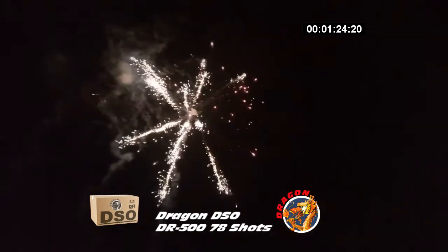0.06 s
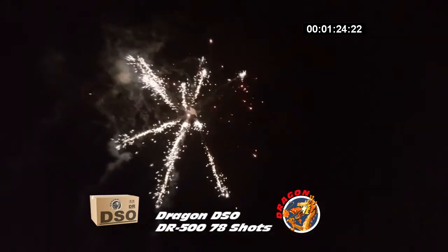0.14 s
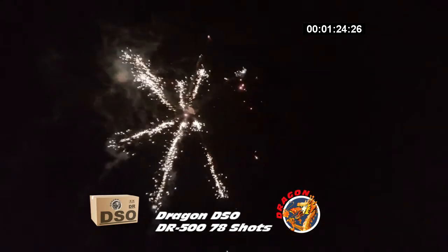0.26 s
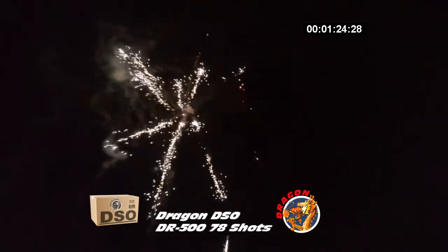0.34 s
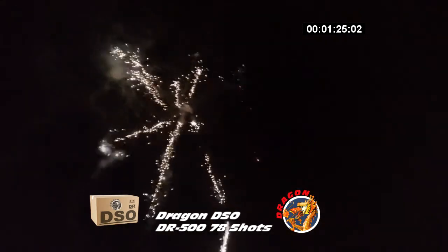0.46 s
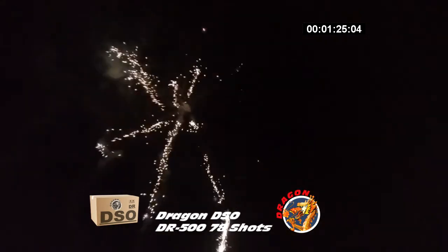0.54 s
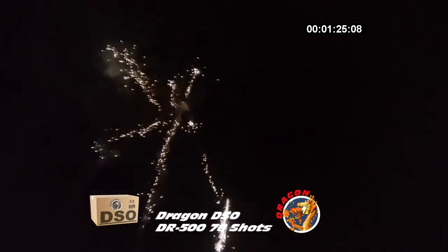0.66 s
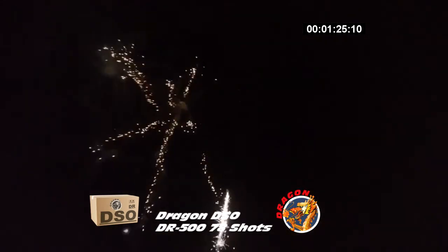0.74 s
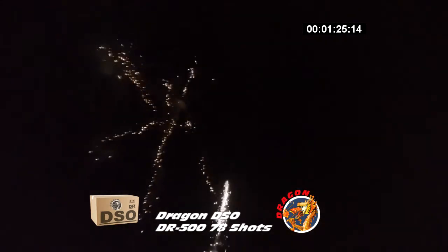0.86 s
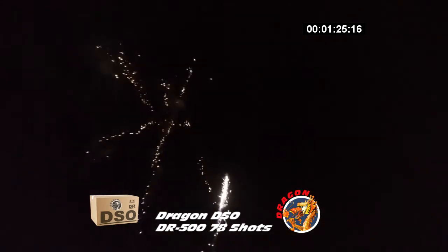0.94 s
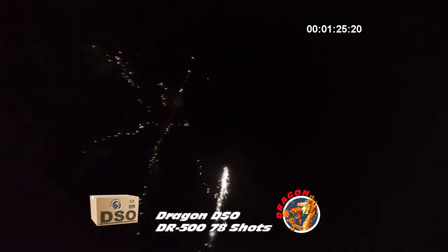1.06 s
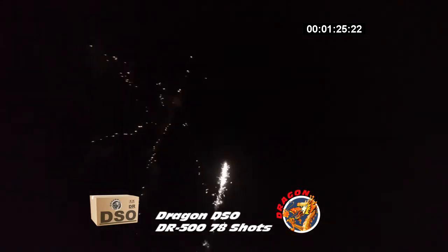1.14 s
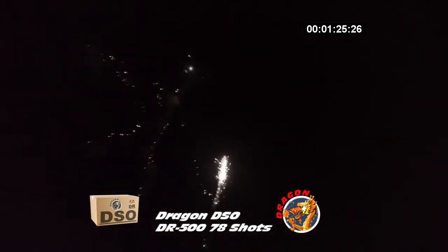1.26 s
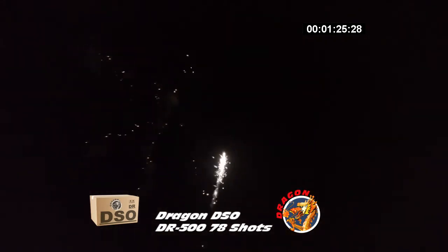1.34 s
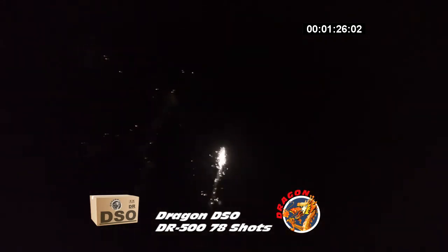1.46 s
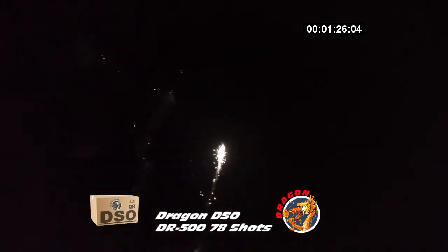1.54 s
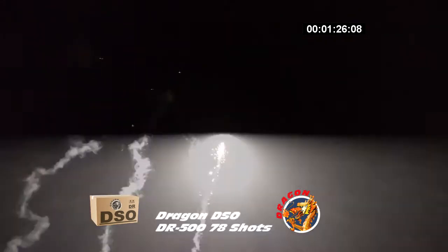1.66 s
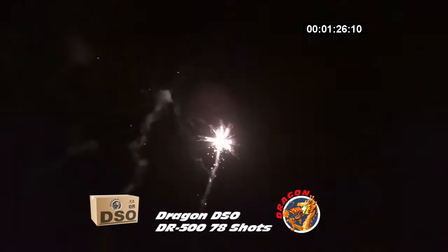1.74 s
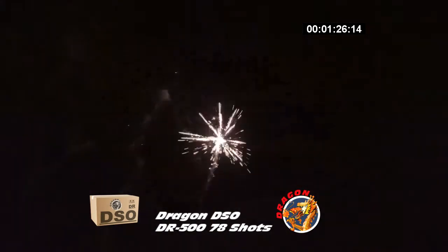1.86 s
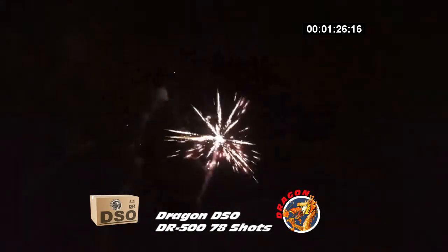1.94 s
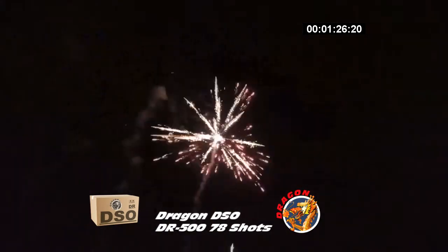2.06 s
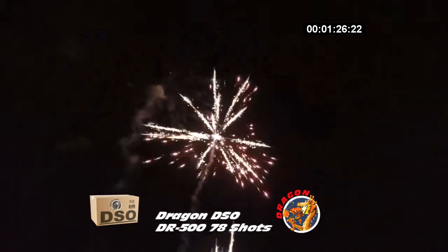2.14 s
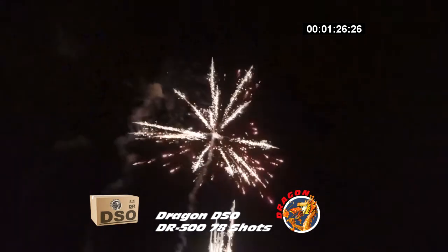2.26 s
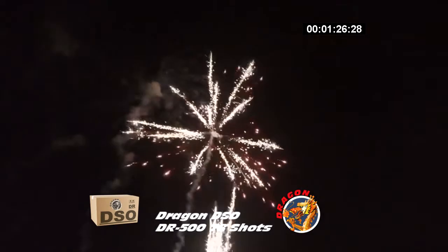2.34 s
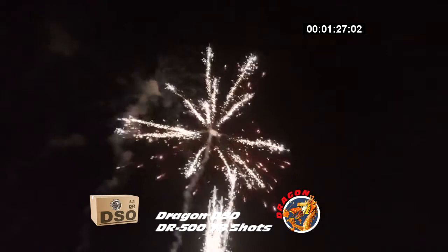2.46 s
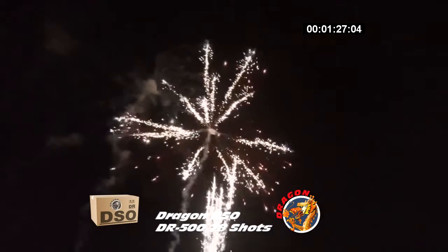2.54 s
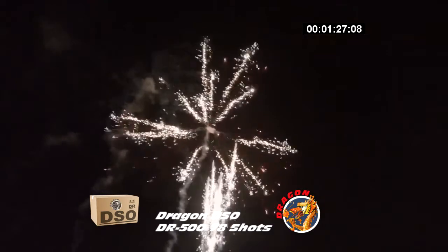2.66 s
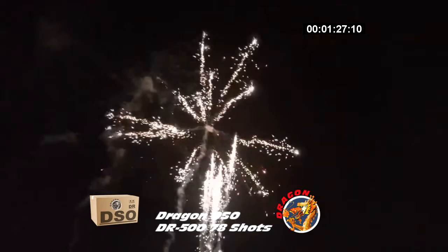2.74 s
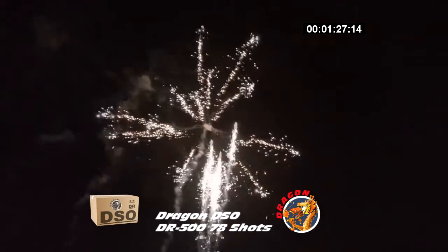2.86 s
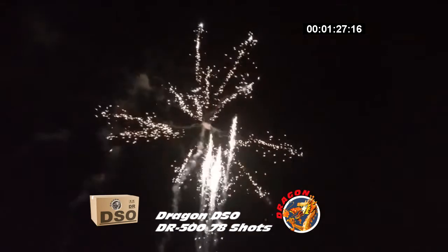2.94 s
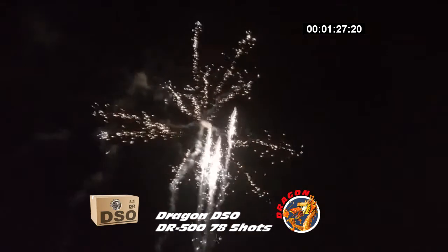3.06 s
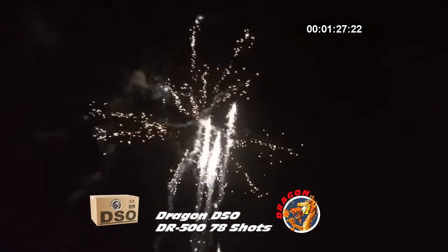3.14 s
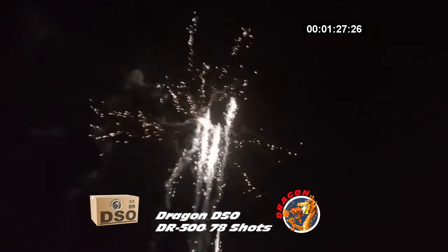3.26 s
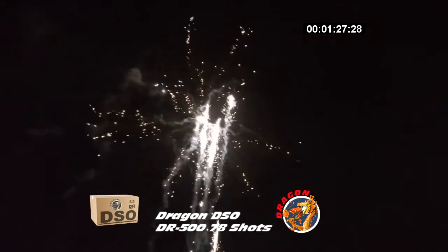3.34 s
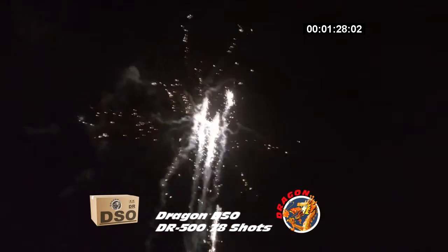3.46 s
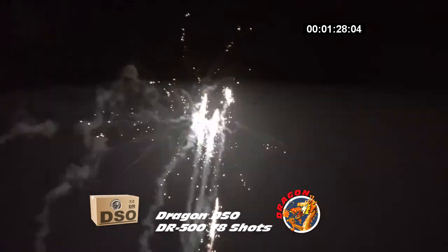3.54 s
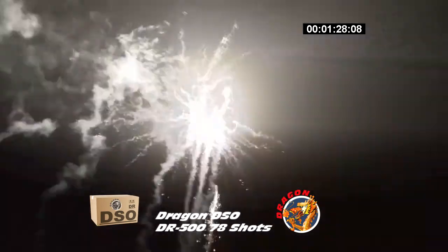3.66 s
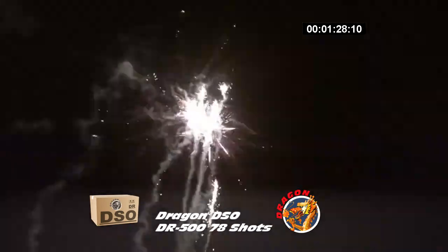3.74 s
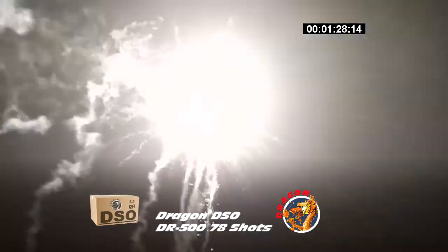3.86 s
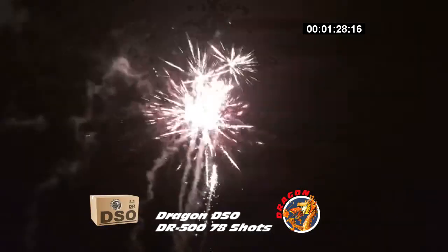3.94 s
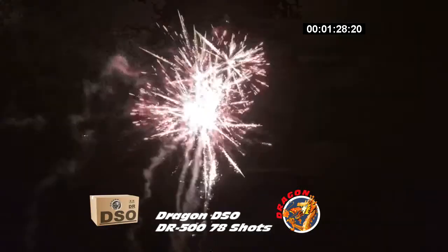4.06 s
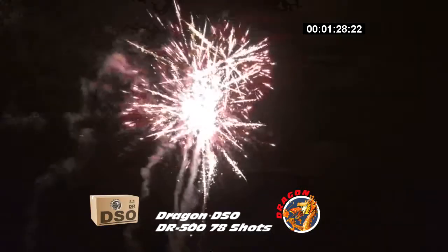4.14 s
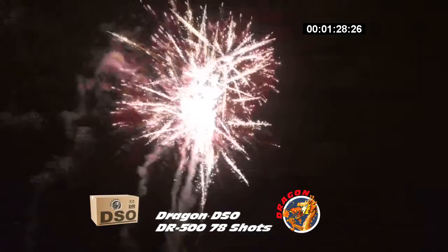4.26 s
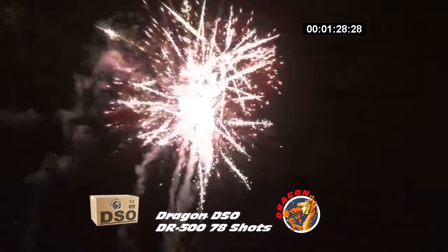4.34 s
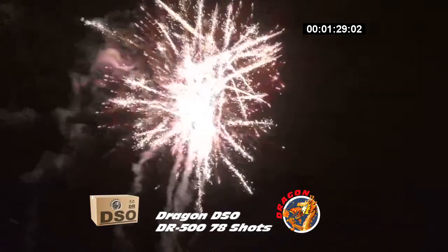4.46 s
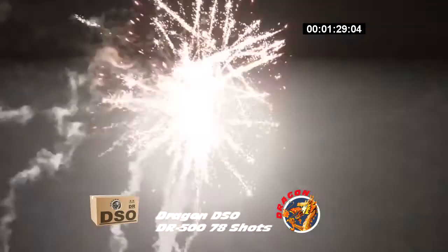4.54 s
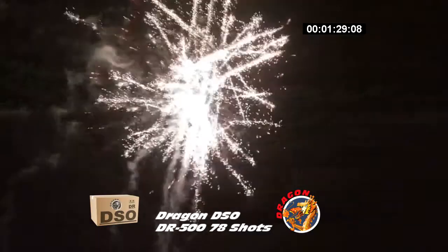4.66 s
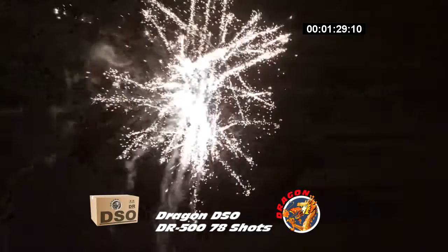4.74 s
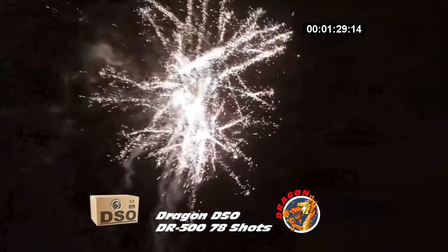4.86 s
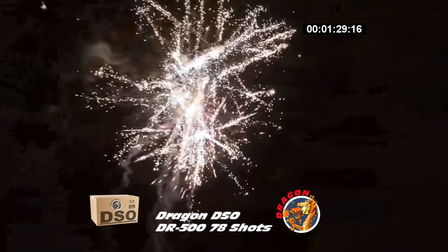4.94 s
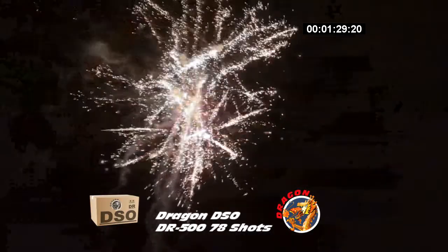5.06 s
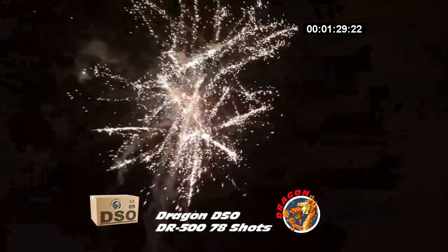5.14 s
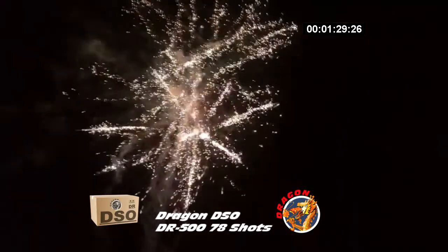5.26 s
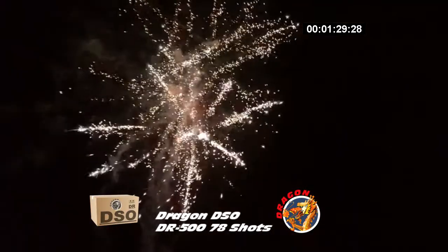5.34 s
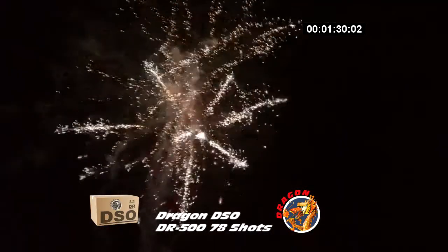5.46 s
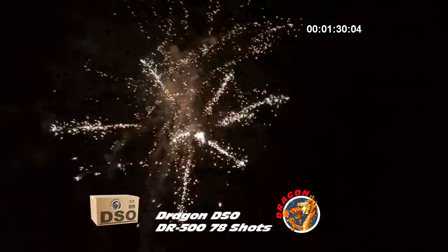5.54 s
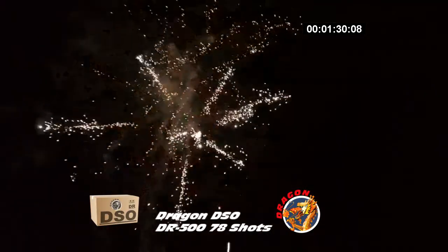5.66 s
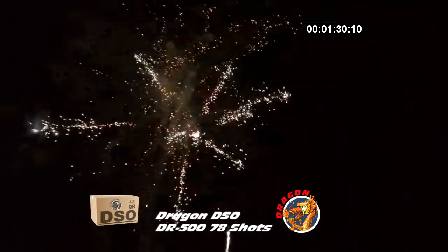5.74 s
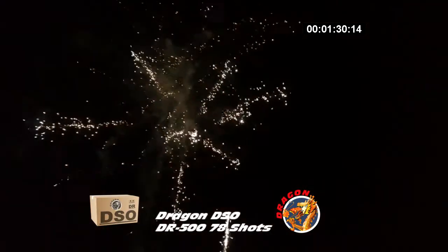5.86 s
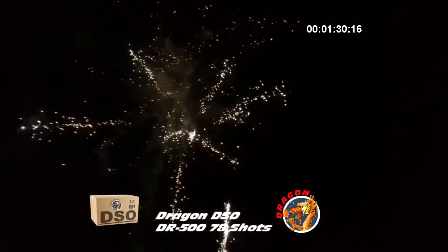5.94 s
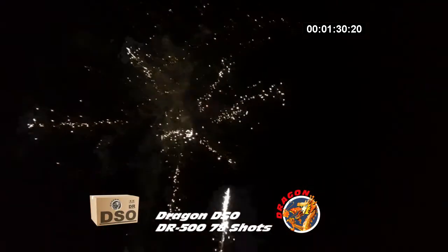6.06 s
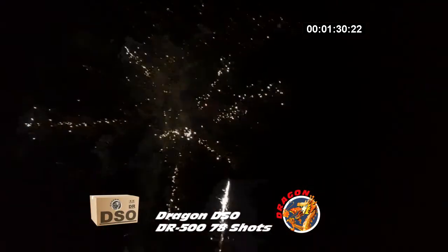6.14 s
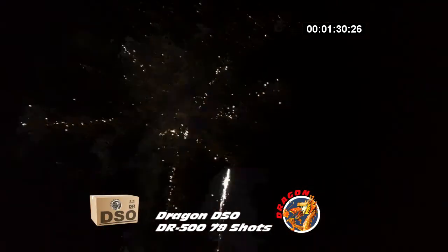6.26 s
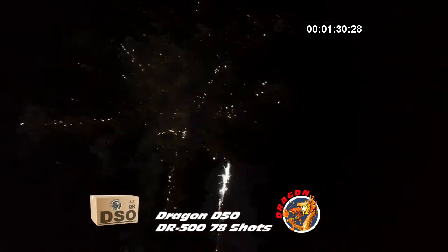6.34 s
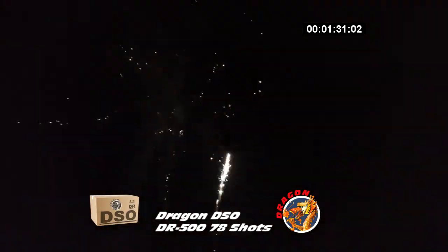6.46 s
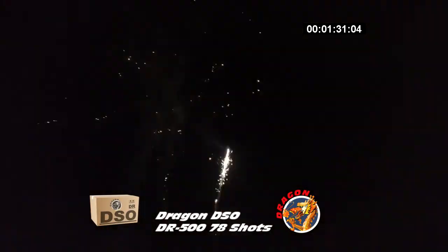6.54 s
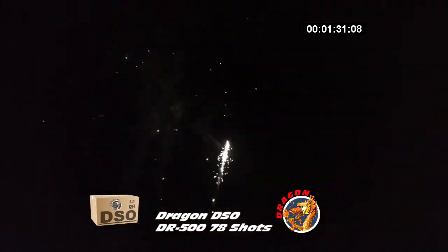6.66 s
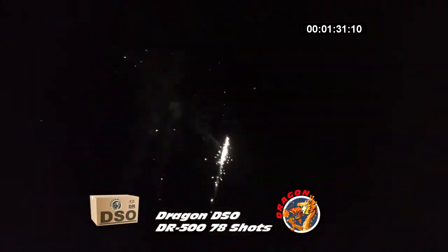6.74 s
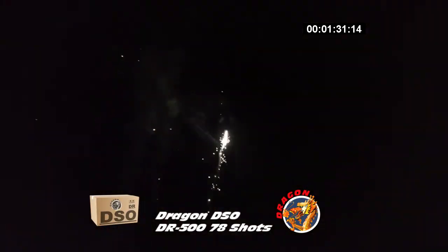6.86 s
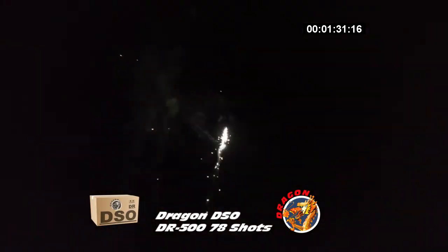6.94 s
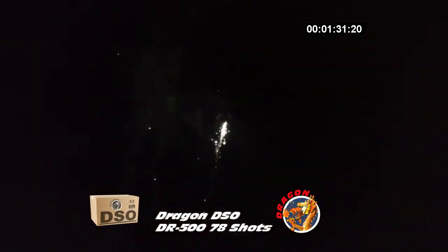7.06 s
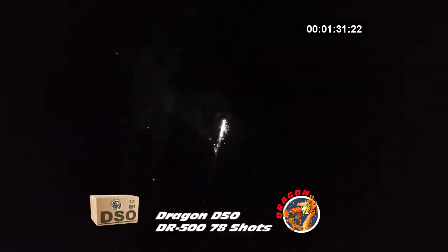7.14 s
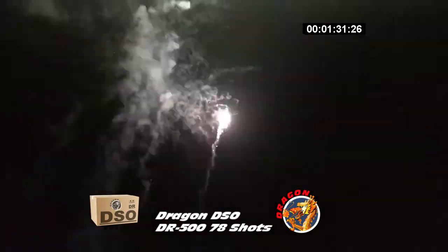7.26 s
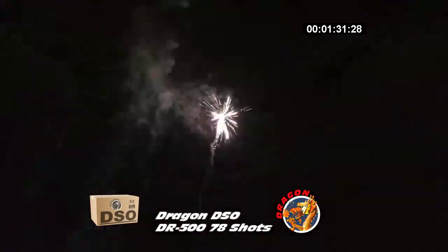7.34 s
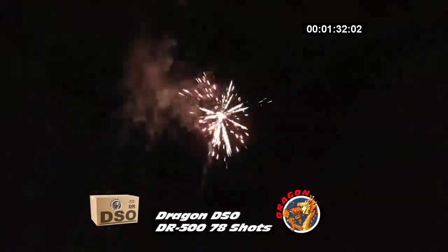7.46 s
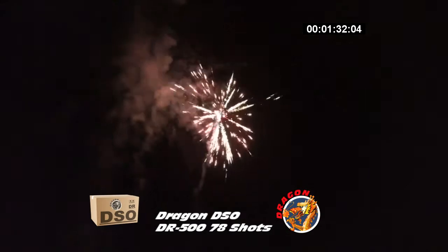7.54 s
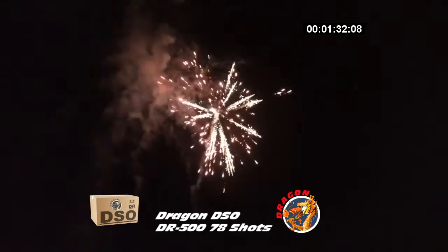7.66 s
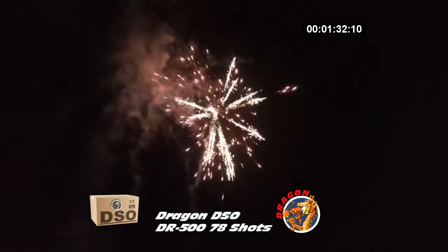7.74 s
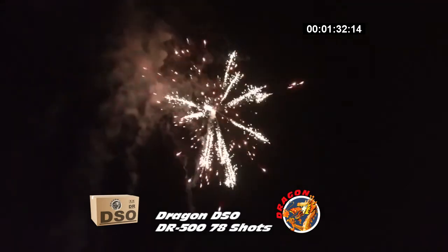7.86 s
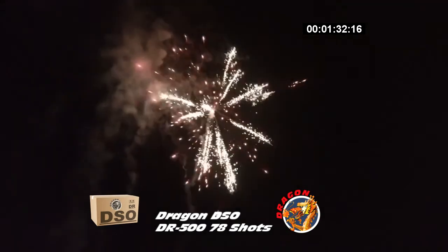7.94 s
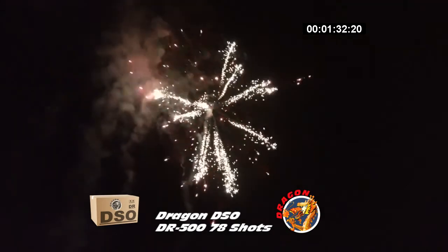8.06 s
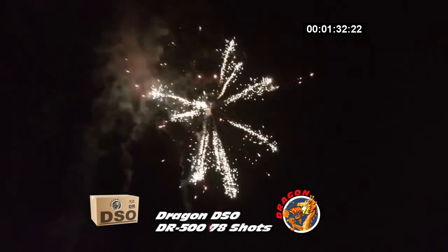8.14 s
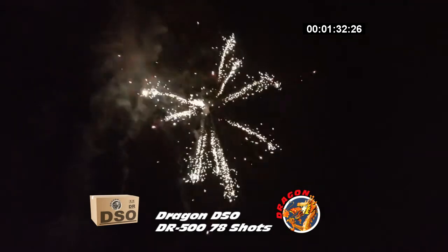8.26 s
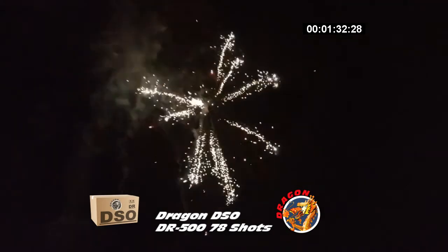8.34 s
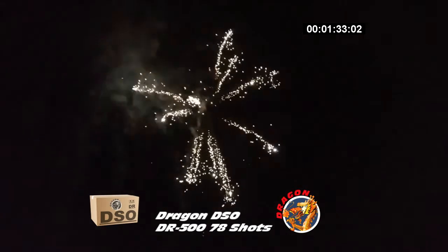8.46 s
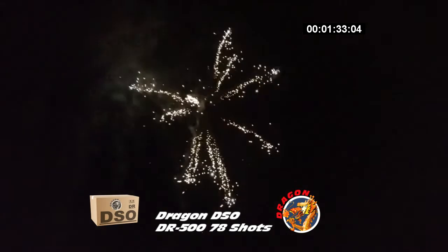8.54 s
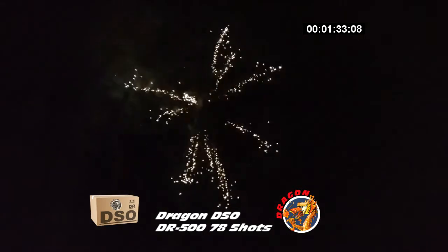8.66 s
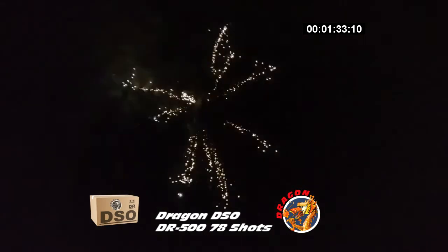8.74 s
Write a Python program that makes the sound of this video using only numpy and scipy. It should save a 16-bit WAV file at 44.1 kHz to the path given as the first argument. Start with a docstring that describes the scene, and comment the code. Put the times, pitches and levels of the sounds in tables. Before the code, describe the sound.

Fireworks crackle densely outdoors while launch thumps and sharp overhead bangs echo, with a rapid salvo in the middle.

```python
"""Outdoors at night, a camera microphone near a firework cake. The sky is already crackling and other
fireworks thud far off. At 1.7 s tubes thump and spit, comets climb on crackling tails, and a shell bursts
overhead. Another comet rises at 2.6 s, a salvo bursts around 4 s, one shell at 4.8 s; a last comet rises
at 5.2 s, a last shell bursts at 7.5 s. The ground repeats each burst at once, the surroundings throw it
back later, and stars crackle in swelling clouds. The limiter pulls the crackle down around every blast."""
import sys
import numpy as np
from scipy import signal
from scipy.fft import rfft, irfft
from scipy.io import wavfile
from scipy.ndimage import uniform_filter1d, minimum_filter1d

SR = 44100
rng = np.random.default_rng(int(sys.argv[2]) if len(sys.argv) > 2 else 0)


def store_wav(level_fs):
    """Save 16-bit WAV to argv[1]."""
    pcm = np.round(np.clip(np.atleast_2d(level_fs), -1, 1) * 32767)
    wavfile.write(sys.argv[1], SR, pcm.T.astype(np.int16))


N = 387638
TIME = np.arange(N) / SR
GROUND_S, GROUND_DB = .009, -3  # bounce off the ground of a sound from overhead

# spectrum of one popping star: f/Hz, level/dB
POP_SPECTRUM = [(40, -19.5), (150, -20.5), (300, -11.5), (700, -6.5), (1200, -4.5), (1750, -3),
                (2350, -4.5), (2700, -8.5), (3050, -6.5), (3750, -2.5), (4750, 0), (6500, -4.5),
                (9500, -7.3), (11000, -12)]
# single loud stars: t/s, peak level/dB
LOUD_STARS = [(.118, -7), (.39, -9), (.4073, -6), (.462, -5), (.5588, -5), (.5764, -4), (.6233, -8),
              (.6744, -6), (.713, -6), (.7368, -7), (.8481, -6), (1.0667, -9), (1.1444, -5), (1.2302, -9),
              (1.3073, -9), (2.3835, -2), (2.4415, -3), (5.532, -8), (5.7257, -9), (5.8501, -8),
              (6.008, -6.5), (6.1185, -12), (6.1568, -9), (6.229, -9), (6.2507, -11), (6.3164, -10),
              (6.5999, -11), (6.7892, -14), (6.866, -8.5), (6.9864, -11), (7.0349, -12), (7.0742, -10),
              (7.171, -10), (7.3346, -10), (7.404, -13.5), (7.4286, -15), (7.471, -15), (7.6661, -12),
              (7.7442, -13), (7.8013, -17), (8.2089, -10), (8.301, -10), (8.3485, -11), (8.4528, -11),
              (8.4597, -11), (8.531, -13), (8.6159, -15), (8.6787, -10.5), (8.699, -14), (8.7087, -15),
              (8.7164, -13), (8.7455, -15), (8.7718, -13)]


def amp(db):
    """Decibels to gain."""
    return 10 ** (np.asarray(db) / 20)


def unit(x):
    """The same sound at rms 1."""
    return x / np.sqrt(np.mean(x ** 2) + 1e-20)


def add(mix, s, sound):
    """Mixes a sound in from time s."""
    part = mix[..., round(s * SR):][..., :sound.shape[-1]]
    part += sound[..., :part.shape[-1]]


def band(x, hz, kind, order=2):
    """A causal low-, high- or band-pass."""
    return signal.sosfilt(signal.butter(order, hz, kind, fs=SR, output="sos"), x)


def zero_phase(x, hz, kind, order):
    """A filter without delay, so that subtracting its output leaves the other band."""
    return signal.sosfiltfilt(signal.butter(order, hz, kind, fs=SR, output="sos"), x)


def convolve(x, response):
    """Sends a sound through a response, keeping its length."""
    return signal.oaconvolve(np.atleast_2d(x), np.atleast_2d(response), axes=1)[:, :x.shape[-1]]


def click(points, uneven_db=0, size=4096):
    """The shortest causal click with a given spectrum, which may be bent at random."""
    hz, db = np.transpose(points)
    log_hz = np.log(abs(np.fft.fftfreq(size, 1 / SR)) + 1)
    bend = np.interp(log_hz, np.linspace(np.log(hz[0]), np.log(hz[-1]), 24), rng.standard_normal(24))
    log_gain = np.log(amp(np.interp(log_hz, np.log(hz), db) + uneven_db * bend))
    return np.fft.ifft(np.exp(np.conj(signal.hilbert(log_gain)))).real[:size // 2]


def stereo_noise(count, width):
    """Noise common to both channels, plus a share that differs."""
    mid, side = rng.standard_normal((2, count))
    return unit(np.array([mid + width * side, mid - width * side]))


def scatter(rise_s, t60, width):
    """A cloud of reflections of energy 1 that builds up and dies away."""
    t = TIME[:min(round(1.2 * t60 * SR), 2 * SR)]
    cloud = stereo_noise(2 * SR, width)[:, :len(t)] * (1 - np.exp(-t / rise_s)) * amp(-60 * t / t60)
    return cloud / np.sqrt((cloud ** 2).sum() / 2)


def swell(s, hold_s, rise_db_per_s, fade_db_per_s):
    """An envelope in dB that reaches 0 at time s, holds and fades."""
    rise_db = np.minimum(TIME - s, 0) * rise_db_per_s
    fade_db = np.maximum(TIME - s - hold_s, 0) * fade_db_per_s
    return np.maximum(rise_db - fade_db, -150)


def thuds_and_rumble(rumble_db=-54.5):
    """Fireworks thud far from the microphone; low rolls swell out of a faint steady rumble."""
    # spectrum of a dull boom: f/Hz, level/dB
    boom_spectrum = [(20, -7), (60, -0.5), (130, 1.5), (220, -2), (400, -7), (1000, -35), (4000, -66)]
    # far-off bursts: t/s, peak level/dB
    far_bursts = [(.525, -22), (.638, -22), (.672, -30), (0.856, -20), (.995, -26), (3.257, -22.5),
                  (6.835, -26.5), (7.158, -23.5), (7.357, -25), (7.391, -27)]
    # low rolls (distant rumble, plus the tail and echo of the tubes firing): t/s, length/s, level/dB
    low_rolls = [(0, 0.13, -41), (.55, 0.24, -37.5), (1.485, 0.092, -46.5), (1.76, 0.1, -43),
                 (2.848, 0.34, -48), (5.616, 0.1, -52), (6.597, 0.073, -40.5), (6.962, 0.48, -46),
                 (8.007, 0.63, -45.5)]
    thuds, boom = np.zeros(N), click(boom_spectrum)
    for s, db in far_bursts:
        add(thuds, s, amp(db) * boom / abs(boom).max())
    roll_power = sum(amp(db + swell(s, length_s, rise_db_per_s=220, fade_db_per_s=47)) ** 2
                     for s, length_s, db in low_rolls)
    rumble = unit(convolve(stereo_noise(N, 0.73), boom)) * np.sqrt(roll_power + amp(rumble_db) ** 2)
    return thuds + amp(2.5) * convolve(thuds, scatter(0.00047, 0.16, width=1.0)) + rumble


def star(direction, lead_s=.000017, pan_db=1.8, near_db=-3.0, bounce_db=-10, tail_db=-14):
    """One pop at the stereo microphone: direct snap, nearby scatter, ground bounce and a faint tail."""
    sides, hz = np.array([[direction], [-direction]]), np.fft.rfftfreq(2048, 1 / SR)
    spectrum = rfft(np.roll(click(POP_SPECTRUM, uneven_db=2), 48))
    spectrum *= np.exp(1j * rng.uniform(0, .5))  # a suction of varying depth follows the push
    pop = np.zeros((2, 8192))
    add(pop, 0, irfft(spectrum * amp(pan_db * sides) * np.exp(2j * np.pi * hz * lead_s * sides)))
    bright = band(pop, [2000, 10000], "band", order=1)
    out = pop + amp(near_db) * convolve(bright, scatter(0.000093, 0.014, width=1.0))
    add(out, GROUND_S * rng.uniform(.7, 1.2), amp(bounce_db) * pop)
    return out + amp(tail_db) * convolve(pop, scatter(0.0061, 0.16, width=0.075))


def star_clouds(bloom_s=.77, treble_db=-4.5, sparkle_db=-1):
    """Shells throw out stars whose crackle peaks bloom_s after the burst; stragglers never stop."""
    # clouds of stars: burst t/s, level/dB, spread in time/s, pop rate/(1/s)
    clouds = [(-.57, -23.5, 0.24, 1800), (1.94, -21.5, 0.27, 3130), (3.962, -21.5, 0.31, 4960),
              (4.79, -28, 0.23, 1200), (7.496, -27.5, 0.19, 1480)]
    straggler_db, straggler_pops_per_s = -42, 110
    yield straggler_db, 0, 0, treble_db, 0, straggler_pops_per_s
    for s, db, spread_s, pops_per_s in clouds:
        alight = np.exp(-.5 * ((TIME - s - bloom_s) / spread_s) ** 2)
        yield db, 10 * np.log10(alight + 1e-12), 0, treble_db, sparkle_db, pops_per_s


def comet_tails(bass_db=-4, sparkle_db=-0.9, flare_s=.52, flare_rise_s=0.14):
    """A tail catches after launch, gets fainter and duller as it climbs, and flares before burning out."""
    # comets: launch t/s, catch delay/s, burnout delay/s, level/dB, treble/dB, pop rate/(1/s), flare/dB
    comets = [(-.07, 0.55, 2.05, -26, 1, 700, 2), (1.729, 0.54, 2.26, -21.5, 3, 3000, 1),
              (2.555, .52, 2.5, -28, -2, 1600, 2.5), (5.154, 0.69, 2.18, -33.5, 2, 340, 3.5)]
    fading_db_per_s, dulling_db_per_s = 1.6, 3.5
    for s, catch_s, burn_s, db, treble_db, pops_per_s, flare_db in comets:
        climbed_s = np.maximum(TIME - s - catch_s, 0)
        flare = np.clip((TIME - s - burn_s + flare_s) / flare_rise_s, 0, 1)
        alight_db = swell(s + catch_s, burn_s - catch_s, rise_db_per_s=72, fade_db_per_s=65.5)
        life_db = alight_db - fading_db_per_s * climbed_s + flare_db * flare
        yield db, life_db, bass_db, treble_db - dulling_db_per_s * climbed_s, sparkle_db, pops_per_s


def flurries(edge_db_per_s=900, pops_per_s=810):
    """Bunches of stars go off together, starting and stopping abruptly."""
    # bunches of stars: t/s, length/s, level/dB
    bunches = [(0.109, 0.1, -40), (2.487, 0.054, -16), (4.648, 0.14, -28), (7.172, 0.012, -45),
               (7.343, 0.0071, -34), (7.478, 0.008, -41), (8.007, 0.24, -39), (8.312, 0.089, -37.5),
               (8.584, 0.05, -41)]
    for s, length_s, db in bunches:
        yield db, swell(s, length_s, edge_db_per_s, edge_db_per_s), 0, 0, 0, pops_per_s


def burning():
    """All that burns overhead, summed: gains of bass, middle, treble and top sparkle, and pops a second."""
    power, rate = np.zeros((4, N)), 0
    for db, life_db, bass_db, treble_db, sparkle_db, pops in (*star_clouds(), *comet_tails(), *flurries()):
        life = amp(life_db) ** 2
        for k, band_db in enumerate((bass_db, 0, treble_db, treble_db + sparkle_db)):
            power[k] += life * amp(db + band_db) ** 2
        rate = rate + pops * life ** .92  # the pops thin out as the sound fades
    return *np.sqrt(power), rate


def volleys(lull_s=.012, lull_db=-6.0, fragments_db=3.0, fragments_s=0.011):
    """Gain of sparse crackle: a short lull before each loud star, then a lift for its fragments."""
    db = np.zeros(N)
    for s, _ in LOUD_STARS:
        add(db, s - lull_s, np.full(round(lull_s * SR), lull_db))
        add(db, s, fragments_db * np.exp(-TIME[:4096] / fragments_s))
    return amp(db)


def crackle(spread_db=2.5, hiss_db=-18, patches=40, steady_s=.03):
    """Tiny explosions all over the sky; each patch has its own colour, direction and reflections."""
    bass_gain, middle_gain, treble_gain, sparkle_gain, rate = burning()
    # many stars together even out the volleys, but a few of them come much closer
    uneven = volleys() ** np.minimum(700 / rate, 1)
    largest = np.clip(2.9 + .9 * np.log(rate / 400), 2.7, 4.8)
    popped = rng.random(N) < rate / SR
    size = amp(spread_db * np.minimum(rng.exponential(1, N), largest)) * popped / np.sqrt(rate)
    # the powder burns steadily, which partly evens out the energy from moment to moment
    window = round(steady_s * SR)
    energy = uniform_filter1d(uniform_filter1d(unit(size) ** 2, window), window)
    size = size * uneven / (energy + .1) ** .22
    patch = rng.integers(0, patches, N)
    pops = sum(convolve(size * (patch == k), star(direction))
               for k, direction in enumerate(np.linspace(-1, 1, patches)))
    # the faintest pops and their reflections merge into a hiss
    hiss = unit(convolve(stereo_noise(N, 0.095), click(POP_SPECTRUM)))
    sky = band(unit(pops) + amp(hiss_db) * hiss, 52, "high")
    # four bands, as comet tails fizz brighter and thinner than stars
    low = zero_phase(sky, 3200, "low", order=3)
    bass = zero_phase(unit(low), 650, "low", order=2)
    sparkle = zero_phase(unit(sky - low), 7000, "high", order=3)
    middle, treble = unit(low) - bass, unit(sky - low) - sparkle
    return bass_gain * bass + middle_gain * middle + treble_gain * treble + sparkle_gain * sparkle


def snaps():
    """A few stars pop much louder and fuller than the cloud around them."""
    out = np.zeros((2, N))
    for s, db in LOUD_STARS:
        pop = band(star(rng.uniform(-1, 1)), [350, 3500], "band", order=1)
        add(out, s, amp(db) * pop / abs(pop).max())
    return out


def spits(rush_db=-1, fizz_db=-9):
    """Rasping spits, muzzle cracks and low growls as the tubes fire and comets rise."""
    # spits, cracks and growls: t/s, level/dB, length/s, rasp f/Hz, growl level/dB
    spits_and_cracks = [(1.6872, -9, .005, 1700, -23), (1.706, -19, .008, 2000, -36),
                        (1.7138, -8, .004, 1650, -18), (1.719, -25, .015, 1500, -21),
                        (1.7335, -10, .008, 1900, -15), (1.7405, -4, .0065, 1900, -12),
                        (1.746, -28, .012, 1500, -17), (1.862, -18.5, .008, 2000, -40),
                        (1.869, -24, .026, 1100, -42), (1.895, -15.5, .013, 1750, -30),
                        (1.906, -20, .019, 1800, -28), (1.9225, -6, .0095, 2100, -19)]
    out = np.zeros((2, N))
    for s, db, length_s, hz, growl_db in spits_and_cracks:
        count = round(length_s * SR)
        rasp = band(stereo_noise(2048, .2), [.8 * hz, 1.2 * hz], "band", order=3)[:, -count:]
        rush = band(band(stereo_noise(2048, .2), 2500, "low", order=6), 550, "high")[:, -count:]
        growl = band(stereo_noise(2048, .1), [70, 320], "band", order=4)[:, -count:]
        fizz = band(stereo_noise(count, 0.66), [3000, 6500], "band", order=1)
        spit = unit(unit(rasp) + amp(rush_db) * unit(rush) + amp(fizz_db) * unit(fizz))
        add(out, s, (amp(db) * spit + amp(growl_db) * unit(growl)) * signal.windows.tukey(count, .5))
    return out


def launches(thump_s=0.0027, echo_hz=140, echo_width_s=0.004, echo_delay_s=.1875):
    """Each lift charge cracks at the muzzle and thumps in the tube; only the thump returns from afar."""
    # tubes firing: t/s, thump level/dB, thump f/Hz, crack level/dB, echo level/dB
    shots = [(1.714, -3, 167, 0, -15.5), (1.7337, -3, 150, 3, -16), (1.7429, 3, 135, 6, -4),
             (2.5540, 0.5, 215, 6.5, -14.5), (5.154, 0, 205, 0, -17)]
    out, t = np.zeros((2, N)), TIME[:2048]
    ring = np.exp(-t / thump_s) * (1 - np.exp(-t / 0.00057))
    crack = band(np.cos(2 * np.pi * 1750 * t) * np.exp(-t / 0.00051), 11000, "low")
    echo_shape = np.exp(-(t / echo_width_s - 1) ** 2)
    echo = -np.sin(2 * np.pi * echo_hz * (t - echo_width_s / 2)) * echo_shape
    for s, thump_db, thump_hz, crack_db, echo_db in shots:
        thump = ring * np.cos(2 * np.pi * thump_hz * t)
        add(out, s, amp(thump_db) * thump + amp(crack_db) * crack)
        add(out, s + echo_delay_s - echo_width_s, amp(echo_db) * echo)
    return out + amp(-8.0) * convolve(band(out, [125, 280], "band"), scatter(0.0022, 0.33, width=0.19))


def roll(start_hz=433, end_hz=140, sink_s=0.13, width_hz=170, rise_s=0.0078, fade_db_per_s=45):
    """The lumpy boom after a burst sinks in pitch as it comes back from ever farther away."""
    t = TIME[:SR]
    centre_hz = end_hz + (start_hz - end_hz) * np.exp(-t / sink_s)
    carrier = np.exp(2j * np.pi * np.cumsum(centre_hz) / SR)
    boom = (carrier * band(stereo_noise(SR, 0.13) / carrier, width_hz / 2, "low")).real
    lumps_db = 4.5 * unit(band(rng.standard_normal(SR), 25, "low"))
    return unit(band(boom, 68, "high")) * (1 - np.exp(-t / rise_s)) * amp(lumps_db - fade_db_per_s * t)


def blast_wave(push_s=.00098, rebound_hz=320, rebound_s=0.0017):
    """A sudden overpressure followed by a longer suction and a small rebound."""
    t = TIME[:2048]
    decay = np.exp(-t / push_s)
    rebound = np.cos(2 * np.pi * rebound_hz * t) * (1 - decay) * np.exp(-t / rebound_s)
    return (1 - t / push_s) * decay + 0.23 * rebound


def bursts(near_db=-15, early_db=-16, roll_db=-44, tail_db=-11):
    """Shells burst overhead: blast, ground bounce, early reflections, slaps, late echo, roll and tail."""
    # shells: t/s, peak level/dB, ground bounce delay/s, late echo delay/s, late echo gain/dB
    shells = [(1.9406, 13.5, 0.0087, 0.22, -15), (3.8482, 13, 0.0096, .235, -26),
              (3.9174, 13, .009, 0.21, -18), (4.0501, 10, 0.01, 0.25, -14), (4.0593, 2, 0.0093, 0.21, -14),
              (4.0756, 7.5, .0101, .245, -13), (4.1233, 11.5, .0098, .248, -16.5),
              (4.7913, 10.5, 0.0089, 0.22, -14.5), (7.4937, 11.5, .009, .227, -14)]
    # spectrum of a burst: f/Hz, level/dB
    blast_spectrum = [(20, 8), (100, -1), (210, 5), (320, 8), (480, 3.5), (800, 8), (1500, 10.5),
                      (2300, 9.5), (2900, 3), (5000, 1), (11000, -2)]
    # slaps off obstacles near the microphone: delay/s, gain/dB
    slaps = [(.031, -14.5), (.059, -20.5), (.108, -29)]
    # colour that the surroundings give the late echo: f/Hz, gain/dB
    echo_colour = [(60, 0), (200, 2.5), (340, -4.5), (550, 2.5), (950, 4.5), (1250, -2.5), (1800, 6),
                   (2500, -10), (6000, -15)]
    # colour of the diffuse tail: f/Hz, gain/dB
    tail_colour = [(25, -32), (90, 3.5), (200, -6.5), (450, -8.5), (1000, -6.5), (2200, 1), (5000, 8.5)]
    out = np.zeros((2, N))
    for s, db, ground_s, echo_s, echo_db in shells:
        wave = convolve(np.pad(blast_wave(), (0, SR)), click(blast_spectrum))[0]
        wave = amp(db) * wave / wave.max()
        dull = band(band(wave, 2200, "low"), 230, "high")  # reflections lose their treble
        add(out, s, wave + amp(near_db) * convolve(wave, scatter(0.0032, 0.2, width=1.0)))
        add(out, s + ground_s, amp(GROUND_DB) * band(wave, 6500, "low", order=1))
        add(out, s + 0.019, amp(early_db) * convolve(dull, scatter(0.0017, 0.29, width=0.95)))
        for delay_s, slap_db in slaps:
            slap = convolve(band(dull[:4096], 980, "low"), scatter(.002, 0.022, width=0.58))
            add(out, s + delay_s, amp(slap_db) * slap)
        echo = convolve(convolve(wave, click(echo_colour)), scatter(0.033, 0.093, width=0.14))
        add(out, s + echo_s, amp(echo_db) * echo)
        add(out, s, amp(db + roll_db) * roll())
        tail = convolve(convolve(wave, click(tail_colour)), scatter(0.0034, 2.26, width=0.44))
        add(out, s, amp(tail_db) * tail)
    return out


def scene():
    """All sources as they reach the microphone."""
    return crackle() + snaps() + band(bursts() + launches(), 30, "high") + spits() + thuds_and_rumble()


def limiter(x, ceiling_db=-1.44, release_s=0.042, reach_s=.015, ramp_s=.003):
    """Looks ahead for peaks, turns down just before them and recovers smoothly."""
    over_db = np.maximum(20 * np.log10(abs(x).max(0) + 1e-9) - ceiling_db, 1e-9)
    over_db = -minimum_filter1d(-over_db, round(reach_s * SR))
    held_db = np.exp(np.maximum.accumulate(np.log(over_db) + TIME / release_s) - TIME / release_s)
    return x * amp(-uniform_filter1d(held_db, round(ramp_s * SR)))


def record(dry, shelf_hz=11100, shelf_db=-22.5, top_hz=15200):
    """The camera's limiter, a steep shelf that leaves little top octave, and the band limit."""
    limited = limiter(dry)
    lowpasses = (signal.firwin(301, hz, window=("kaiser", 9), fs=SR) for hz in (shelf_hz, top_hz))
    body, whole = (signal.oaconvolve(limited, taps[None], "same") for taps in lowpasses)
    return body + amp(shelf_db) * (whole - body)


dry = scene()
out = record(dry)
store_wav(out)
```